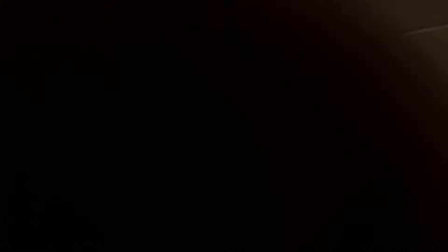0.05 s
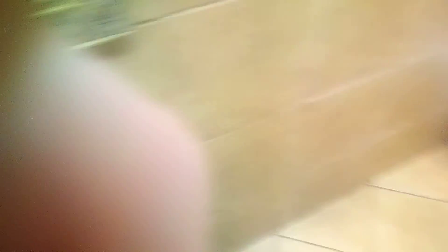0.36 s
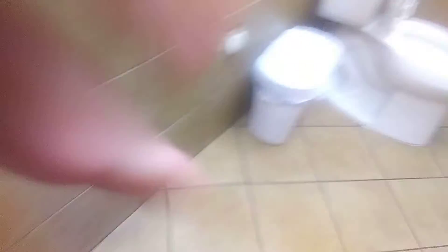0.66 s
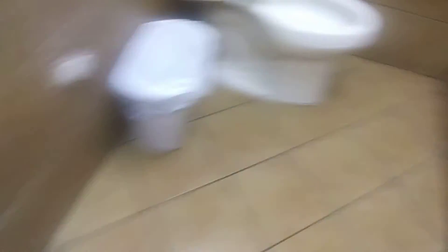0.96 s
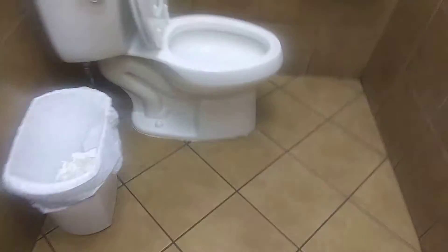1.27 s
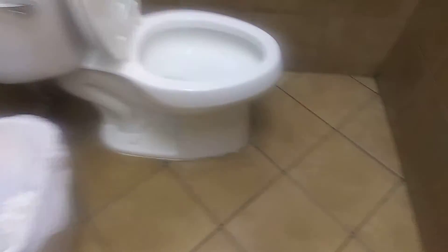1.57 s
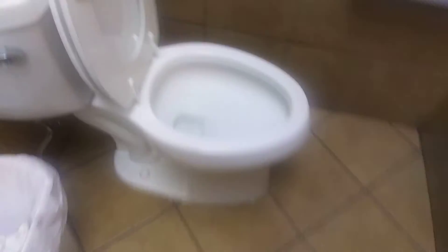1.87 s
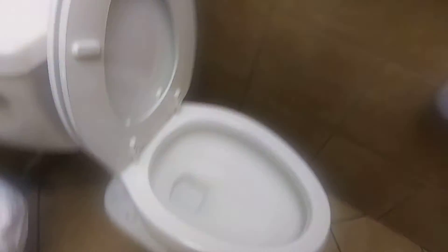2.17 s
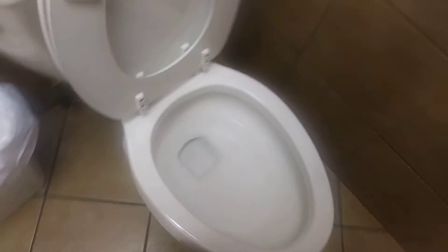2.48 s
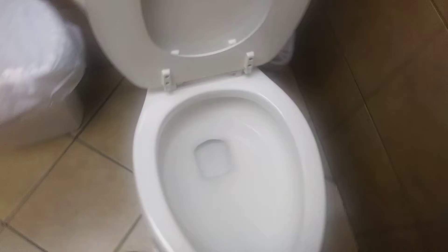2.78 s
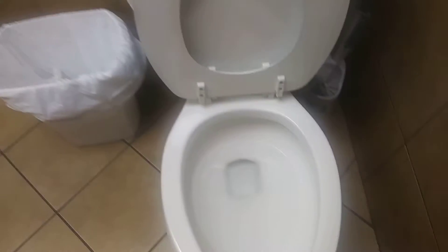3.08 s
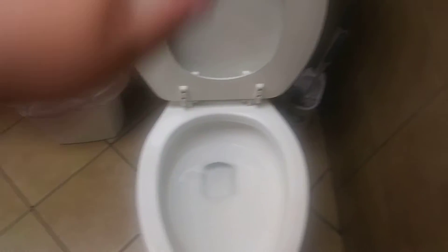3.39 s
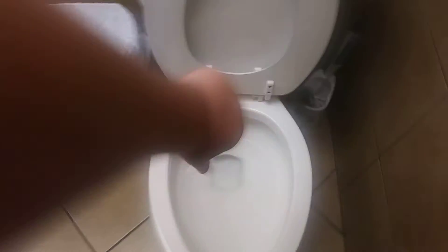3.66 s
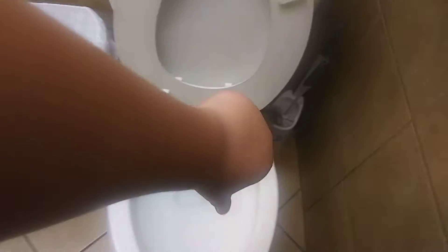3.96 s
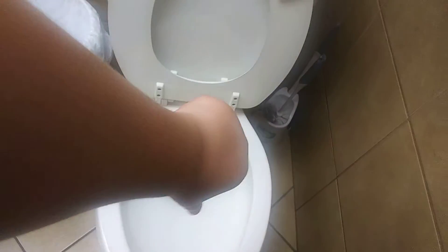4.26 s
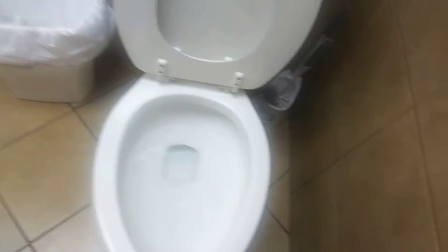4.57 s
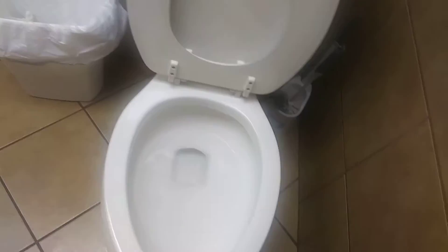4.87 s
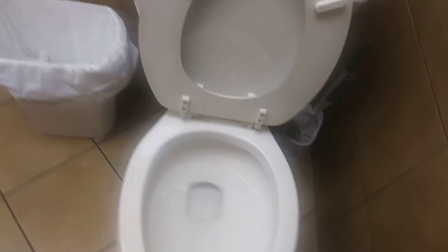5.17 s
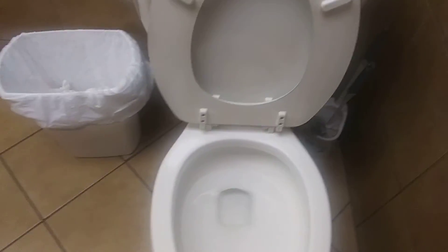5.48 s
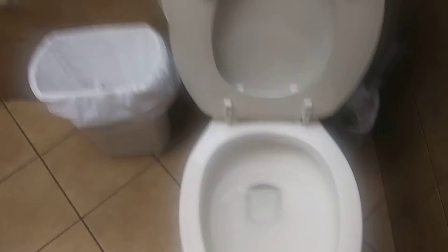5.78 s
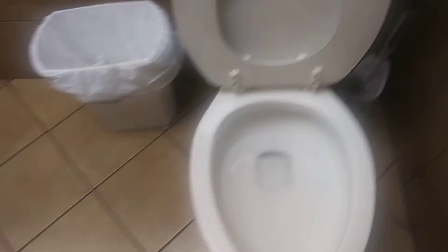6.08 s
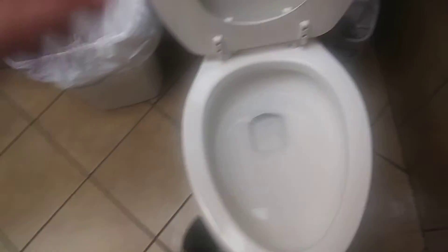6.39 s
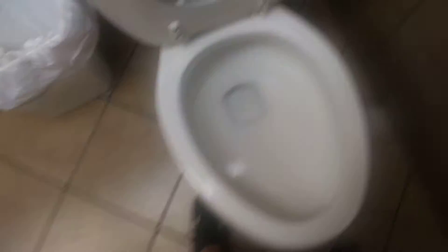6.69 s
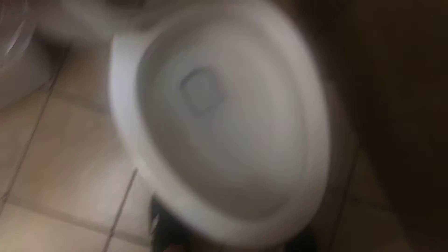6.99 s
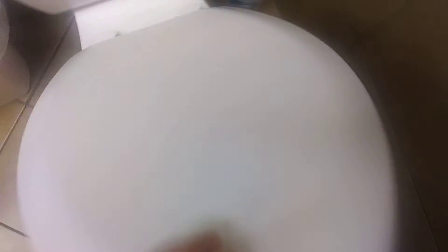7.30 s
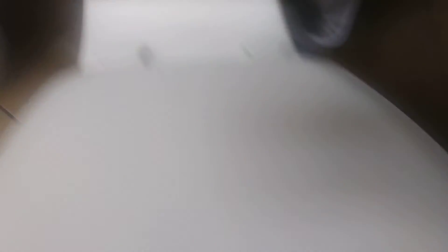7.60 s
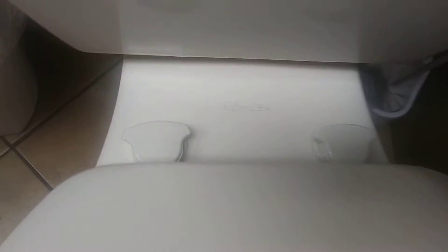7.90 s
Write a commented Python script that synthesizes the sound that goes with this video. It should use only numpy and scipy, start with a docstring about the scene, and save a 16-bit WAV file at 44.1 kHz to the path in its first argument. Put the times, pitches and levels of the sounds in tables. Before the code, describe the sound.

A faint fan hums in a tiled restroom, with two spells of close handling thuds and a light toilet lid clack.

```python
"""Handling a camera in a restroom

A fan hums quietly in a small tiled restroom, under a faint microphone hiss.
Fingers bump, tick and rub on a hand-held camera as the grip shifts, at the start and again later.
Near the end a hand takes hold of the plastic toilet lid, which clicks and knocks softly,
and the hard walls echo it."""
import sys
import numpy as np
from scipy import signal
from scipy.fft import rfft, irfft
from scipy.io import wavfile

SR = 44100
rng = np.random.default_rng(int(sys.argv[2]) if len(sys.argv) > 2 else 0)


def log_audio(samples):
    """Write samples as a 16-bit WAV file to the path given in sys.argv[1]."""
    # one column per channel
    frames = np.atleast_2d(samples).T
    # limit to full scale, then quantise
    limited = np.clip(frames, -1, 1)
    pcm = np.round(limited * 32767).astype(np.int16)
    wavfile.write(sys.argv[1], SR, pcm)


N = 355005
TIME = np.arange(N) / SR


def from_db(db):
    """Turn decibels into a number to multiply by."""
    return 10 ** (np.asarray(db) / 20)


def unit_level(x):
    """Scale a sound so that its average level (rms) is 1."""
    return x / np.sqrt(np.mean(x ** 2) + 1e-20)


def add(out, start_s, sound):
    """Mix a sound in at the given time."""
    at = max(round(start_s * SR), 0)
    out[at:at + len(sound)] += sound[:N - at]


def keep_band(x, hz, kind, order=2):
    """Let the "low" side, the "high" side or a "band" through; a higher order cuts more steeply."""
    sections = signal.butter(order, np.clip(hz, 10, SR / 2 - 100), kind, fs=SR, output="sos")
    return signal.sosfilt(sections, x + 1e-18)


def boost_band(x, hz, width_hz, db):
    """Make one band of pitches louder, or quieter if db is negative."""
    r = np.exp(-np.pi * width_hz / SR)
    feedback = [1, -(1 + r * r) * np.cos(2 * np.pi * hz / SR), r * r]
    band = signal.lfilter(np.array([1, 0, -1]) * (1 - r * r) / 2, feedback, x)
    return x + (from_db(db) - 1) * band


def delay_bass(x, hz, width_hz):
    """Make the pitches around and below hz arrive late, without changing their level."""
    r = np.exp(-np.pi * width_hz / SR)
    feedback = [1, -2 * r * np.cos(2 * np.pi * hz / SR), r * r]
    return signal.lfilter(feedback[::-1], feedback, x)


def ring(x, hz, fade_s):
    """Each push sets one tone ringing, which drops by 60 dB in fade_s."""
    r = from_db(-60 / (fade_s * SR))
    angle = 2 * np.pi * hz / SR
    return signal.lfilter([0, np.sin(angle)], [1, -2 * r * np.cos(angle), r * r], x + 1e-18)


def drift(turns_per_s):
    """A slow random wander, about 1 in size."""
    points = rng.standard_normal(int(turns_per_s * N / SR) + 2)
    return np.interp(TIME * turns_per_s, np.arange(len(points)), points)


def shaped_noise(spectrum):
    """Steady noise of level 1; the table says how strong its pitches are next to each other."""
    points_hz, db = np.transpose(spectrum)
    hz = np.arange(N // 2 + 1) * SR / N + 1e-3
    gain = from_db(np.interp(np.log(hz), np.log(points_hz), db, left=-120, right=-120))
    return unit_level(irfft(rfft(rng.standard_normal(N)) * gain, N))


# The tone colour of the hiss: pitch_hz, relative_db
HISS_SPECTRUM = [(3000, -13), (5000, -8), (6300, -2), (8000, -1), (10500, -0.5), (13000, 0), (15800, 1)]


def microphone_hiss(level_db=-76):
    """The microphone adds a faint, high, steady noise of its own."""
    return from_db(level_db) * shaped_noise(HISS_SPECTRUM)


# The tone colour of the rushing air: pitch_hz, relative_db
AIR_SPECTRUM = [(28, -29), (42, -13.5), (55, 0.5), (100, -2), (160, -3), (235, -8), (330, -8), (450, -8),
                (640, -10.5), (880, -15.5), (1200, -16.5), (2000, -20.5), (3400, -24), (5000, -36.5)]
# Tones of the duct and room that the fan stirs up: pitch_hz, width_hz, level_db
DUCT_TONES = [(57.76, 6, -78), (194.4, 5, -81.5), (287.2, 14, -76.5), (400.7, 20, -78), (435.4, 8.7, -82.5),
              (463, 8, -81), (628, 12, -80.5)]
# How loud the fan's hum is as the camera moves through the room: time_s, level_db
FAN_LEVELS = [(0, -66.5), (1.0, -74), (2.2, -72), (3.2, -74), (4.5, -68.5), (5.4, -75.5), (6.3, -79),
              (6.9, -71), (7.5, -84), (8.05, -89)]


def ventilation(air_db=-65.5, blade_hz=394, waver_hz=3.3, swell_db=3):
    """Air rushes steadily, the duct drones along, and the fan blades hum a slightly wavering tone."""
    phase = 2 * np.pi * np.cumsum(blade_hz + waver_hz * drift(turns_per_s=9)) / SR
    hum_db = np.interp(TIME, *np.transpose(FAN_LEVELS))
    hum_db += swell_db * drift(turns_per_s=7)  # standing waves: the room has loud and quiet spots
    blades = from_db(hum_db) * np.sqrt(2) * np.sin(phase)
    rush, stir = shaped_noise(AIR_SPECTRUM), shaped_noise(AIR_SPECTRUM)
    duct = np.zeros(N)
    for hz, width_hz, db in DUCT_TONES:
        fade_s = np.log(1000) / (np.pi * width_hz)  # a narrower tone rings longer
        drone = ring(keep_band(stir, 0.77 * hz, "high"), hz, fade_s)
        duct += from_db(db) * unit_level(drone)
    return from_db(air_db) * rush + duct + blades


def tiled_room(x, fade_s=0.5, echo_db=1):
    """Hard walls send back many echoes, which blur together and die away evenly."""
    t = np.arange(SR) / SR
    tail = rng.standard_normal(SR) * from_db(-60 * t / fade_s) * (t > .004)
    tail /= np.sqrt(np.sum(tail ** 2))
    return x + from_db(echo_db) * signal.fftconvolve(x, tail)[:N]


# The hand's touches on the toilet lid: start_s, strength_db, lowest_hz, highest_hz
LID_KNOCKS = [(6.872, -42.5, 1500, 4200), (6.893, -46.5, 150, 1200), (6.906, -48.5, 150, 610)]
# The tones the plastic lid rings with: pitch_hz, relative_db, fade_s
LID_TONES = [(255, 2.5, 0.14), (279, 1, 0.084), (567, -4, 0.047), (820, -3, 0.041), (908, -2.5, 0.043),
             (1246, -9, 0.12), (1644, -0.5, 0.0146), (1885, -13, .03), (2220, -13.5, 0.046),
             (2770, -11.5, .025), (3370, -10.5, .015)]


def toilet_lid(clack_db=8, ring_db=-7):
    """A hard click, then softer knocks: each is a dry clack that also sets the lid ringing."""
    force, click = np.zeros(N), signal.unit_impulse(SR // 20)
    for start_s, db, low_hz, high_hz in LID_KNOCKS:
        add(force, start_s, from_db(db) * keep_band(click, [low_hz, high_hz], "band"))
    ringing = sum(from_db(db) * ring(force, hz, fade_s) for hz, db, fade_s in LID_TONES)
    return tiled_room(from_db(ring_db) * ringing + from_db(clack_db) * force)


def camera_body(force, bass_db):
    """On the way to the microphone the bass lags and lingers, so a push falls in pitch like a 'dup'."""
    shake = keep_band(force, 50, "high", order=6)
    lagged = delay_bass(shake, hz=69.3, width_hz=81)
    return boost_band(lagged, hz=62, width_hz=20, db=bass_db)


# The tone colour of the handling sounds: pitch_hz, width_hz, boost_db
HANDLING_BANDS = [(98.6, 17, -6), (181, 54, 0), (450, 100, 0.5), (630, 63, -3.5), (790, 220, 1.5),
                  (1780, 350, -0.5), (4960, 2300, -11), (10540, 1500, 5)]


def handling_colour(x):
    """The case shapes the low and middle bands, the microphone dips near 5 kHz, and the top is lifted."""
    for hz, width_hz, db in HANDLING_BANDS:
        x = boost_band(x, hz, width_hz, db)
    return x


def stroke(start_s, length_s, fade_s, swell_s=.03):
    """The loudness of one rub: it swells quickly, holds, then dies away."""
    swell = np.clip((TIME - start_s) / swell_s, 0, 1)
    return swell * from_db(-60 * np.clip((TIME - start_s - length_s) / fade_s, 0, 3))


# Strokes of skin over the case: start_s, length_s, rumble_db, grit_db
SKIN_STROKES = [(0, 0.49, -53.5, -66), (0.572, .24, -52, -69), (0.99, 0.15, -56.5, -73),
                (1.15, 0.817, -66, -78.5), (5.245, 0.03, -59.5, -78), (5.57, 0.61, -60, -77),
                (5.685, 0.029, -49, -63), (5.752, 0.069, -38, -56), (5.96, 0.031, -42.5, -58.5),
                (6.214, 0.12, -53.5, -69), (7.466, 0.3, -67, -80)]


def finger_rub(slips_per_s=1800, spread_db=1.7, rumble_fade_s=0.35, grit_fade_s=0.194):
    """Sliding skin sticks and slips: the many tiny slips make a low rumble with dry grit on top."""
    rumble_gain, grit_gain = np.zeros(N), np.zeros(N)
    for start_s, length_s, rumble_db, grit_db in SKIN_STROKES:
        rumble_gain = np.maximum(rumble_gain, from_db(rumble_db) * stroke(start_s, length_s, rumble_fade_s))
        grit_gain = np.maximum(grit_gain, from_db(grit_db) * stroke(start_s, length_s, grit_fade_s))
    sizes = from_db(spread_db * np.minimum(rng.exponential(1, N), 4)) * rng.choice([-1, 1], N)
    slips = sizes * (rng.random(N) < slips_per_s / SR)
    dull_slips = keep_band(keep_band(slips, 570, "low"), 160, "low", order=1)
    rumble = unit_level(camera_body(dull_slips, bass_db=4.0))
    grit = unit_level(keep_band(keep_band(slips, [520, 1050], "band", order=1), 2300, "low"))
    sizzle = from_db(-19) * unit_level(keep_band(slips, 8000, "high"))
    return rumble_gain * rumble + grit_gain * (grit + sizzle)


# The case clicks under the grip: start_s, level_db, lowest_hz, highest_hz, rattle_ms
GRIP_TICKS = [(0.1263, -40, 1020, 15000, 3.9), (0.13, -29, 6880, 14350, 0.46),
              (0.1387, -40, 7000, 14160, 1.2), (0.26, -34.5, 6760, 15600, 0.56),
              (0.2618, -34.5, 1010, 2960, 1.2), (0.482, -52, 7000, 15000, .6),
              (0.748, -45.5, 400, 2900, .29), (0.7612, -40.5, 1000, 9000, .15),
              (5.6503, -45.5, 624, 1760, 0.265), (5.6832, -50, 3000, 15000, .3),
              (5.7004, -51, 500, 3000, 0.27), (5.801, -44.5, 700, 6950, .5), (5.9785, -45, 500, 1480, 0.42),
              (5.993, -48, 750, 1830, .73), (6.0123, -41, 480, 1010, 1.2), (6.2287, -41, 700, 2030, 0.35)]


def case_ticks(rattle=.14, rise_ms=0.397):
    """The case gives way in tiny slips that build up to one sharp snap and die within milliseconds."""
    out, snap_at = np.zeros(N), SR // 60
    ms = np.arange(-snap_at, snap_at) * 1000 / SR
    for start_s, db, low_hz, high_hz, rattle_ms in GRIP_TICKS:
        rise_and_fall = np.exp(np.minimum(ms / rise_ms, -ms / rattle_ms))
        slips = rattle * rng.standard_normal(len(ms)) * rise_and_fall
        slips[snap_at] += 1
        tick = keep_band(slips, [low_hz, high_hz], "band", order=4)
        add(out, start_s - snap_at / SR, from_db(db) * tick / np.abs(tick).max())
    return out


# Fingers land on the camera: start_s, level_db, contact_ms, lingering_bass_db
FINGER_LANDINGS = [(0.1231, -6.5, 0.9, -1.5), (0.167, -39, 1.3, -15), (0.2623, -25.5, 0.8, -6),
                   (0.2641, -25, 1.5, -12), (0.3312, -28, 1.4, 5), (0.393, -27, 2.77, 0),
                   (0.465, -46, 2.1, 4), (0.700, -35, 1.64, 3), (0.762, -20.5, 0.592, -5),
                   (1.056, -41, 2.74, -18), (1.331, -37.5, 1.55, -8), (1.831, -40.5, 2.2, -10),
                   (5.255, -46, 1.37, -7), (5.6507, -32, 0.76, 7), (5.790, -26.5, 1.56, -17),
                   (5.881, -29, 1.8, -11), (5.965, -33.5, 1.27, -9.5), (6.014, -24, 2.34, -6.5),
                   (6.2294, -32, 0.5, 2), (6.2338, -29.5, 2.24, -0.5), (7.769, -43.5, 3, -6)]


def finger_bumps(spring_back=0.2, settle_s=.017, settle_db=-21, settle_ms=3.0):
    """A fingertip pushes once, then settles with a softer push; a shorter contact gives a higher thud."""
    out, t = np.zeros(N), np.arange(SR // 4) / SR
    lead_s = .015  # time for the push to build up
    for start_s, db, contact_ms, bass_db in FINGER_LANDINGS:
        landing = (start_s, db, contact_ms)
        settling = (start_s + settle_s, db + settle_db, settle_ms)
        for push_s, push_db, push_ms in landing, settling:
            contact_s = push_ms / 1000
            push = np.exp(-((t - lead_s) / contact_s) ** 2)
            force = keep_band(push, spring_back / contact_s, "high", order=1)
            thud = camera_body(force, bass_db)
            add(out, push_s - lead_s, from_db(push_db) * thud / np.abs(thud).max())
    return out


def scene():
    """Fingers right at the microphone, the lid and the fan out in the room, and hiss beneath."""
    handling = handling_colour(finger_bumps() + case_ticks() + finger_rub())
    return (handling + toilet_lid() + ventilation() + microphone_hiss())[None]


def record(dry):
    """Cut away the very highest treble, steeply."""
    cutoff_hz = 15850
    return signal.sosfilt(signal.ellip(12, .1, 70, cutoff_hz, fs=SR, output="sos"), dry)


dry = scene()
out = record(dry)
log_audio(out)
```